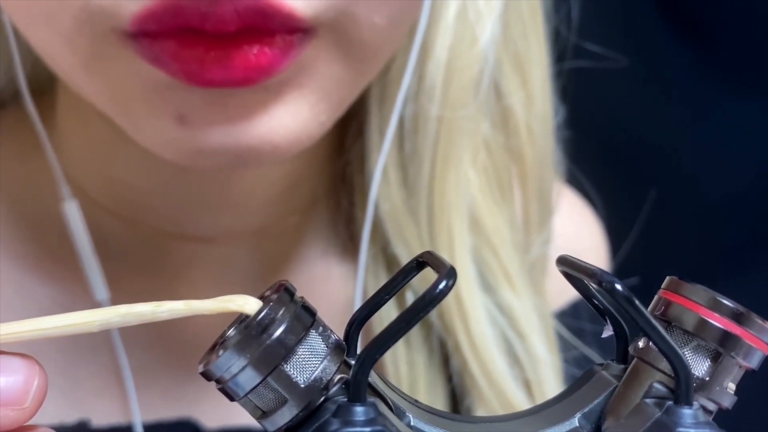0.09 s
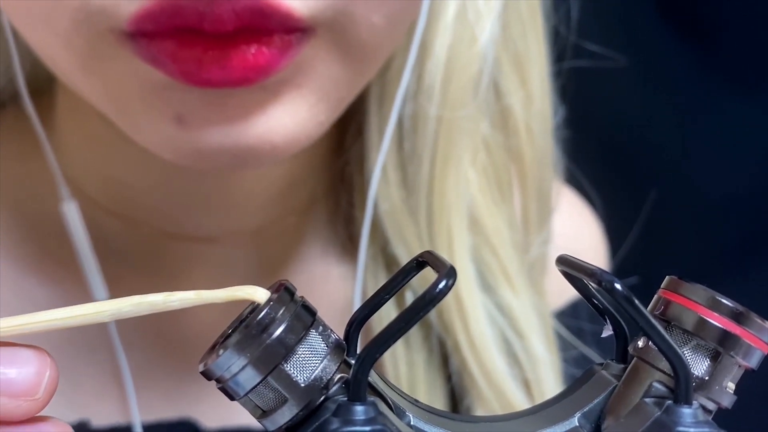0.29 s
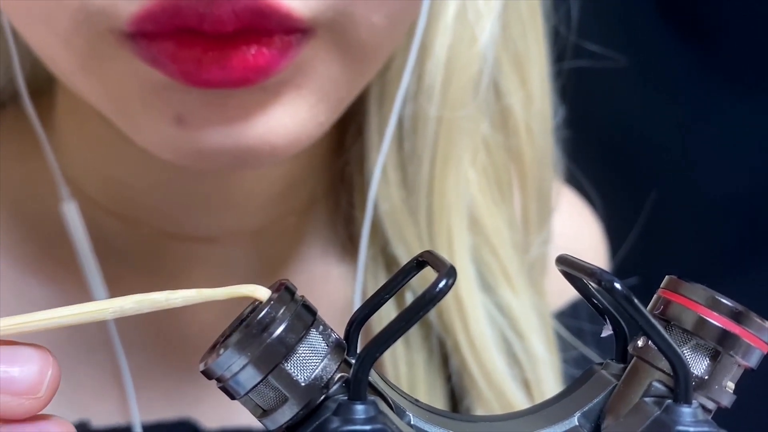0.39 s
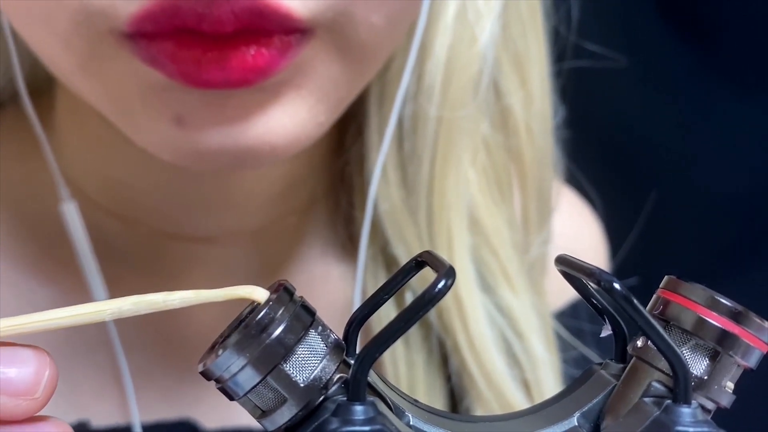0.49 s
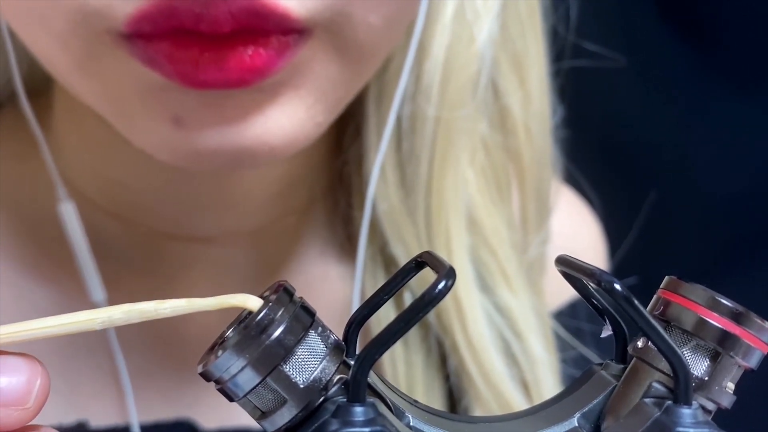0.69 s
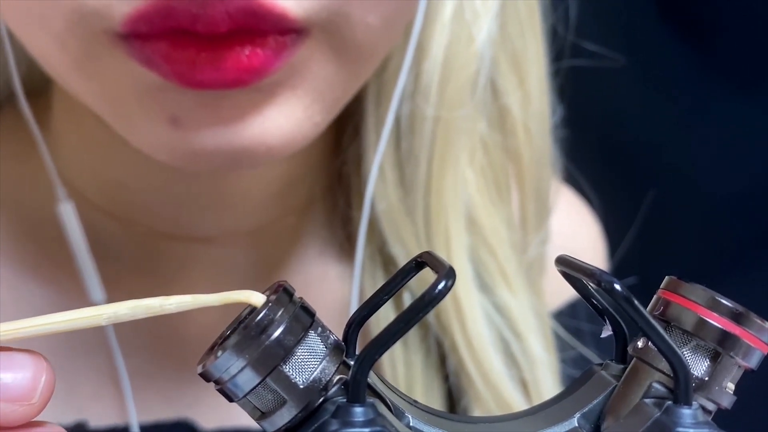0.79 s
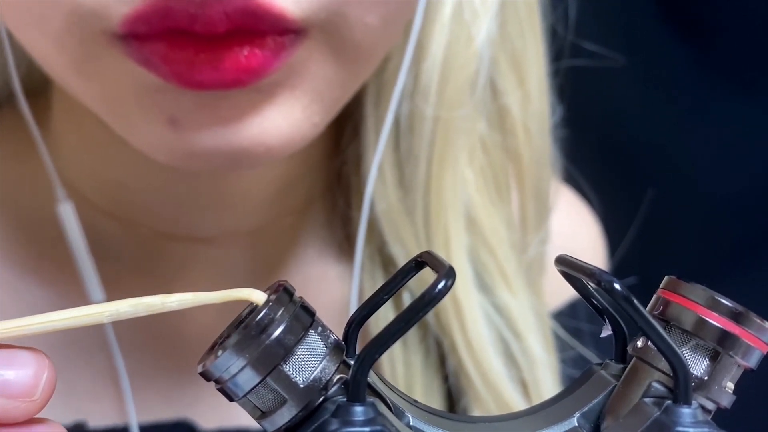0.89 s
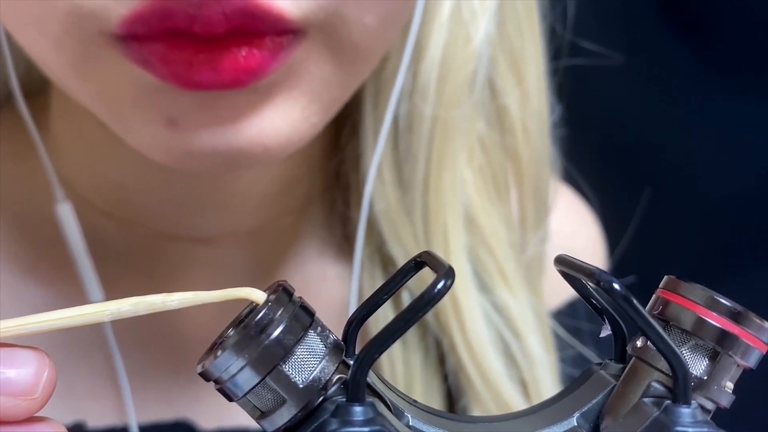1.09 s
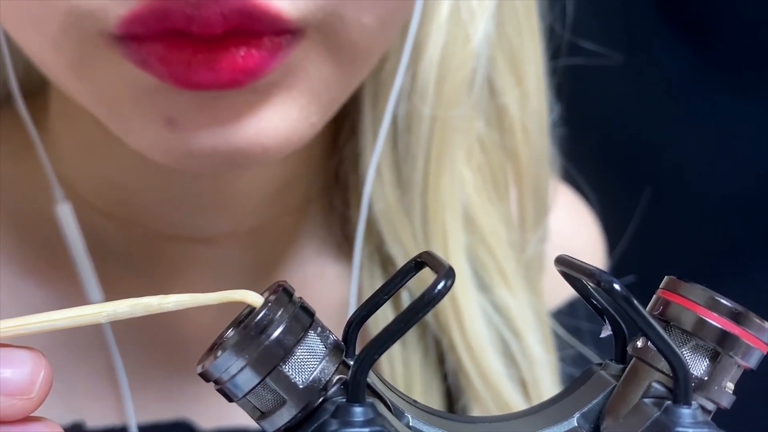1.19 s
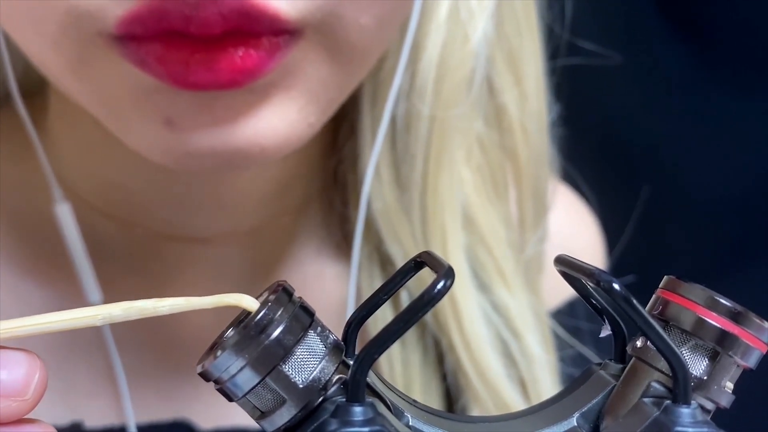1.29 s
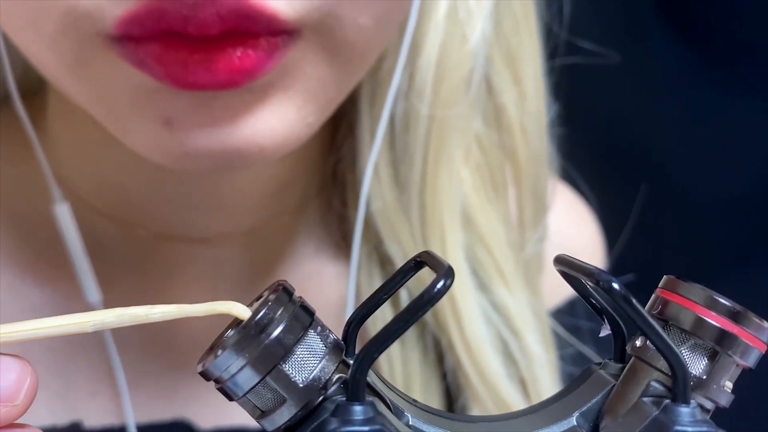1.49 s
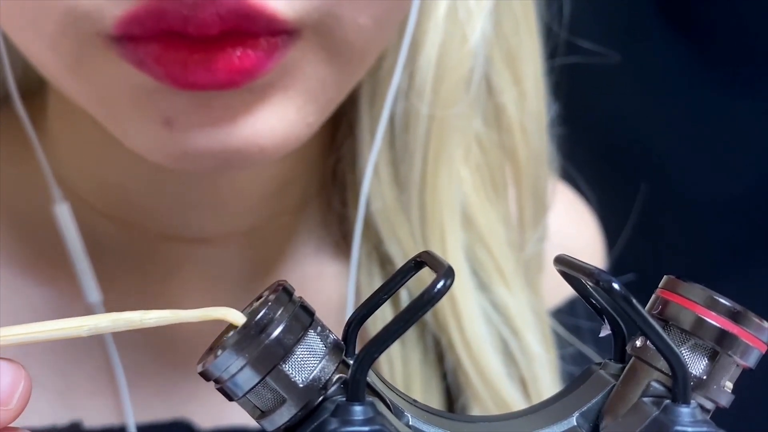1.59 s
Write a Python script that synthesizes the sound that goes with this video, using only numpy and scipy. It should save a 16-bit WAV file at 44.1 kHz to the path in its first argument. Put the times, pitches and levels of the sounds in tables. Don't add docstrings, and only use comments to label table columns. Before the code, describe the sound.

A wooden pick pokes and scrapes a metal mesh microphone grille, making crackly clicks and dull thumps

```python
import sys
import numpy as np
from scipy import signal
from scipy.fft import rfft, irfft, next_fast_len
from scipy.io import wavfile
from scipy.ndimage import uniform_filter1d

SR = 44100
rng = np.random.default_rng(int(sys.argv[2]) if len(sys.argv) > 2 else 0)


def boost_factor(decibels):
    exponent = np.asarray(decibels, float) / 20
    return 10 ** exponent


def wrap_up_sound(samples):
    columns = np.atleast_2d(samples).T
    tamed = np.clip(columns, -1, 1)
    steps = np.round(tamed * 32767).astype(np.int16)
    wavfile.write(sys.argv[1], SR, steps)


N = 70560
TIME_S = np.arange(N) / SR
CAPSULE_HZ, CAPSULE_WIDE_HZ = 665, 75
RELEASE_S = 0.0075


def unit(x):
    return x / np.sqrt(np.mean(x ** 2) + 1e-20)


def filtered(x, response):
    size = next_fast_len(N + SR // 2)
    spectrum = rfft(x, size) * response(np.fft.rfftfreq(size, 1 / SR))
    return irfft(spectrum, size)[..., :N]


def mode(f, hz, wide_hz):
    return 1j * f * wide_hz / (hz * hz - f * f + 1j * f * wide_hz)


def ringing(peaks):
    return lambda f: sum((-1) ** k * boost_factor(db) * mode(f, hz, wide) for k, (hz, wide, db) in enumerate(peaks))


def slips(per_s, spread_db):
    chance, side, size = rng.random((3, N))
    happens = chance < per_s / SR
    return unit(happens * np.sign(side - .5) * boost_factor(-spread_db * np.log(size + 0.002)))


def stroke(rows, column, release_s):
    total = np.zeros(N)
    for row in rows:
        start_s, length_s = row[:2]
        attack = np.clip((TIME_S - start_s) / (0.0009 + 0.48 * length_s) + .5, 0, 1)
        release = np.exp(-np.clip(TIME_S - start_s - length_s, 0, 1) / release_s)
        total += boost_factor(row[column]) * attack * release
    return total


# mode_hz, width_hz, left_db, right_db
FRAME_MODES = [(630, 26, -6, -17.5), (847, 49, 5.5, 0), (1136, 58, -36, -1.5), (1460, 140, -18.5, -12),
               (1870, 160, -14, -8.5), (2027, 54, -7, -3), (2450, 296, -12, -7.5), (2660, 120, -16.5, -15)]
LEFT_SIGNS = [-1, -1, -1, -1, -1, -1, 1, -1]


def frame(force):
    top_hz = 2630

    def response(f):
        modes = 0
        for (hz, wide, left_db, right_db), sign in zip(FRAME_MODES, LEFT_SIGNS):
            modes = modes + mode(f, hz, wide) * np.array([[sign * boost_factor(left_db)], [boost_factor(right_db)]])
        return modes * -1j * mode(f, top_hz, top_hz) * top_hz / (f + 1)

    return filtered(force, response)


# start_s, length_s, force_db, tip_pressure_db, sway_db
STROKES = [(0, 0.019, -61, -58.5, -63), (0.141, 0.04, -59, -54.5, -46), (.178, 0.02, -59.5, -49.5, -44),
           (.203, 0.021, -67.5, -61.5, -46), (0.229, 0.041, -54, -56, -43),
           (.28, 0.0067, -57.5, -48, -46.5), (0.309, 0.0073, -70, -60, -72),
           (0.425, 0.0018, -45, -34.5, -42), (.436, 0.023, -54.5, -41.5, -49),
           (0.535, 0.017, -54.5, -45.5, -52), (.56, 0.01, -53, -43, -68), (0.567, 0.0077, -50, -36.5, -64),
           (0.587, 0.018, -51.5, -40.5, -51), (0.613, 0.026, -70, -60.5, -51),
           (0.731, 0.091, -67, -62.5, -58.5), (.801, 0.019, -53.5, -40.5, -58),
           (.897, 0.018, -51.5, -39, -54), (0.91, 0.011, -50.5, -36.5, -38.5),
           (0.946, 0.012, -50, -37.5, -49), (0.962, 0.016, -58, -48.5, -36), (1.034, 0.071, -83, -66, -75),
           (1.158, 0.03, -59.5, -52, -50), (1.191, 0.086, -64.5, -62.5, -53.5),
           (1.282, 0.088, -62.5, -60, -50.5), (1.385, 0.083, -71, -65.5, -58.5),
           (1.471, 0.1, -69.5, -68.5, -57.5), (1.574, 0.044, -58.5, -62.5, -44.5)]


def rub():
    spread_db = 3.5
    swell = uniform_filter1d(uniform_filter1d(rng.standard_normal(N), size=300), size=300)
    force = stroke(STROKES, column=2, release_s=RELEASE_S) * boost_factor(3 * unit(swell))
    train = slips(3500, spread_db)
    body = frame(train * force) / np.std(frame(train)[0])

    def dull(f):
        peaks = mode(f, 360, 470) + boost_factor(3) * mode(f, CAPSULE_HZ, CAPSULE_WIDE_HZ)
        return peaks * (1 + 120 / (30 + 1j * f)) / (1 + 1j * f / 1100) ** 2

    press = slips(1900, spread_db)
    pressure = press * stroke(STROKES, column=3, release_s=RELEASE_S)
    tip = filtered(pressure, dull) / np.std(filtered(press, dull))
    return body + tip * np.array([[0], [1]]), force


# middle_s, signed_size [full scale], load_ms, release_ms
PUSHES = [(0.4265, -0.18, 0.82, 0.21), (0.4273, 0.14, 0.42, 0.59), (.429, 0.055, 0.35, .4),
          (0.429, -0.024, 0.25, 0.33), (0.4566, 0.072, 1.05, 0.11), (.549, -0.034, 0.43, 0.83),
          (0.5576, 0.041, 0.76, 0.5), (0.5612, 0.065, 0.89, 0.24), (0.5625, -0.088, 0.37, 0.41),
          (0.566, .03, 0.31, 0.36), (.5692, 0.024, 0.29, 0.56), (0.569, 0.013, 0.15, 0.1),
          (.573, 0.074, 0.52, 0.074), (0.5748, -0.033, 0.11, 0.21), (0.5768, -0.15, 0.44, 0.3),
          (0.5778, -0.19, 0.13, 0.7), (0.5912, -0.0043, 0.23, 0.62), (0.5949, -0.043, 0.33, 0.3),
          (0.601, -0.05, 0.33, 0.26), (0.8251, .04, 1.3, 2.3), (0.3201, 0.0085, 0.56, 0.3),
          (0.8065, -0.049, 0.85, 0.77), (0.8135, -0.033, .15, 0.97), (0.8187, 0.096, 0.34, 0.39),
          (0.8187, -0.041, 0.066, 0.38), (0.8198, -0.04, 0.66, 1.1), (0.8967, -0.082, 0.55, 0.56),
          (0.8984, 0.082, 0.61, 0.44), (0.9001, 0.12, 0.31, 0.44), (0.9019, -.05, 0.52, 0.47),
          (.905, 0.067, 0.15, 0.75), (0.908, -0.046, 0.79, 0.33), (.9087, -0.017, 0.35, 0.26),
          (.913, 0.087, 0.34, 0.24), (0.9138, -0.083, 0.28, 0.15), (0.9163, 0.028, 0.85, 0.031),
          (0.9178, -0.19, 0.11, 0.068), (0.9188, -0.14, 0.45, 1.4), (0.9231, 0.048, 0.28, 0.2),
          (0.925, 0.11, 1.5, 2.3), (.948, -0.17, 0.72, 0.21), (0.951, .05, 0.38, 0.52),
          (.951, -0.091, 0.18, 0.37), (.952, 0.09, 0.58, 0.2), (.954, 0.15, 0.49, 0.31),
          (0.9559, -0.051, .4, 0.38), (.965, 0.064, 0.16, 0.59), (0.9685, -0.036, 1.1, 0.32),
          (1.1561, -0.067, 0.72, 0.26), (1.157, 0.062, 0.61, 1.13)]


def pushes():
    total = np.zeros(N)
    for middle_s, size, load_ms, release_ms in PUSHES:
        side_ms = np.where(TIME_S < middle_s, load_ms, release_ms)
        total += size * np.exp(-.7 * np.abs((TIME_S - middle_s) * 1000 / side_ms) ** 1.5)
    return total


# start_s, level_db
TAPS = [(0.4266, -9), (.428, -2), (0.4302, -5), (.441, -6), (0.4442, -18), (.544, -16), (0.5924, -10),
        (0.8184, -6), (0.9179, 1), (0.919, -1), (0.952, -12), (0.9652, -10), (1.1582, -14.5),
        (1.168, -11.5), (1.171, -20), (1.175, -15), (1.277, -16.5), (1.357, -19), (0.185, -12),
        (0.199, -22), (.252, -14), (0.263, -16), (0.287, -16)]


def poke():
    push, taps = pushes(), np.zeros(N)
    for start_s, level_db in TAPS:
        taps[round(start_s * SR)] = boost_factor(level_db)
    direct = filtered(push, lambda f: 1 + 0.54 * mode(f, CAPSULE_HZ, CAPSULE_WIDE_HZ))
    rebound = filtered(push, lambda f: mode(f, 58, 14.7))
    knock = frame(boost_factor(-25) * np.gradient(push) * 30 + taps)
    return np.array([-boost_factor(-20) * rebound, direct + rebound]) + knock


# middle_s, length_ms, level_db
CRACKLES = [(0.191, 3.8, -79), (0.265, 4.9, -76), (0.284, 2.5, -73), (0.4288, 4, -58), (0.43, 3, -67),
            (.44, 6.3, -87), (0.4565, 3.7, -56), (0.544, 7, -66), (0.562, 2.3, -58), (0.574, 2, -55),
            (0.578, 1.4, -66), (0.601, 11, -65), (0.811, 9.7, -61), (0.8185, 0.86, -52), (.9, 2.6, -57.5),
            (0.9141, 1.2, -44), (.917, 1.7, -36), (0.93, 6.5, -64), (0.947, 2, -66), (0.954, 6.3, -60.5),
            (0.962, 2, -56), (0.965, 1.7, -51.5), (0.974, 2.6, -68), (1.1562, 1.2, -66),
            (1.275, 2.1, -64.5), (0.5967, 3.8, -70), (.602, 1.6, -61)]
# start_s, length_s, level_db
DRAGS = [
    (.15, 0.018, -78.5),
    (.235, 0.065, -81),
    (1.16, .055, -76),
    (1.225, 0.15, -76),
    (1.4, 0.166, -82),
    (1.575, .03, -75),
]
# peak_hz, width_hz, level_db
MESH = [(3580, 1800, 7), (5470, 1000, 8), (7900, 690, 5.5), (9300, 620, 6), (10600, 720, 11),
        (12900, 4900, -3)]
# peak_hz, width_hz, level_db
RASP = [(3200, 800, -1), (6000, 800, 0), (8900, 600, 1), (13000, 5000, -9)]


def crackle(force):
    burst, snaps = np.zeros(N), slips(10000, 4)
    for middle_s, length_ms, level_db in CRACKLES:
        burst += boost_factor(level_db) * np.exp(-.5 * ((TIME_S - middle_s) * 1000 / length_ms) ** 2)
        snaps[round(middle_s * SR)] = -6
    rasp = snaps * (boost_factor(-17.5) * force + stroke(DRAGS, column=2, release_s=RELEASE_S))
    near = filtered(snaps * burst, ringing(MESH)) / np.std(filtered(snaps, ringing(MESH)))
    near = near + filtered(rasp, ringing(RASP)) / np.std(filtered(snaps, ringing(RASP)))
    knock = boost_factor(5) * frame(snaps * burst) / np.std(frame(snaps)[0])
    far = boost_factor(-20.5) * np.roll(near, 14)
    return np.array([far, near]) + knock


# start_s, signed_swing [full scale, left capsule], swing_hz
JOLTS = [(.008, 0.0064, 75), (0.137, 0.016, 58), (.179, -0.004, 70), (0.198, 0.021, 67),
         (0.231, -0.022, 73), (0.258, 0.000046, 79), (0.273, 0.035, 69), (0.32, -0.0068, 60),
         (0.433, -0.018, 74), (0.464, 0.025, 50.4), (.475, -0.0011, 46), (0.546, 0.007, 65.7),
         (0.588, 0.0046, 59.6), (0.818, 0.022, 66), (0.919, 0.0035, 65.5), (0.963, 0.033, 57),
         (0.984, -0.023, 55.3), (1.049, 0.0053, 70), (1.149, -0.012, 73), (1.167, 0.021, 107),
         (1.1755, 0.011, 61), (1.226, -0.0021, 65), (1.283, -0.0021, 77.5), (1.307, -0.0016, 70),
         (1.477, -0.0056, 70), (1.58, -0.017, 72)]


def sway():
    left_gain, own_gain, swell_s = boost_factor(-5.5), boost_factor(-6), 0.0057
    rumble = boost_factor(-64.5)
    shakes = rng.standard_normal((2, N))
    rock = lambda f: mode(f, 70, 51.4) / (1 + 1j * f / 220) ** 2
    level = stroke(STROKES, column=4, release_s=0.0099) * boost_factor(7.5) + rumble
    both, own = filtered(shakes * level, rock) / np.std(filtered(shakes, rock))
    for start_s, swing, hz in JOLTS:
        since = np.clip(TIME_S - start_s, 0, 1)
        swell = since / swell_s * np.exp(1 - since / swell_s)
        both = both - swing / left_gain * np.sin(2 * np.pi * hz * since) * swell
    return np.array([-left_gain * (both + own_gain * own), both])


# point_hz, level_db [per Hz]
HISS = [(30, -5.5), (170, -16), (404, -26), (801, -30), (2120, -32.5), (2600, -37.5), (3980, -40),
        (16000, -42)]


def hiss():
    hz, db = np.transpose(HISS)
    shape = lambda f: boost_factor(np.interp(np.log(f + 1), np.log(hz + 1), db))
    return boost_factor(-58.5) * unit(filtered(rng.standard_normal((2, N)), shape))


def scene():
    scratch, force = rub()
    return scratch + poke() + crackle(force) + sway() + hiss()


def roll_off(x):
    return signal.sosfilt(signal.butter(12, 16240, fs=SR, output="sos"), x)


def record(dry):
    limited = filtered(dry, lambda f: (f < 15830) * 1j * f / (28 + 1j * f))
    return roll_off(limited - .0008)


dry = scene()
out = record(dry)
wrap_up_sound(out)
```